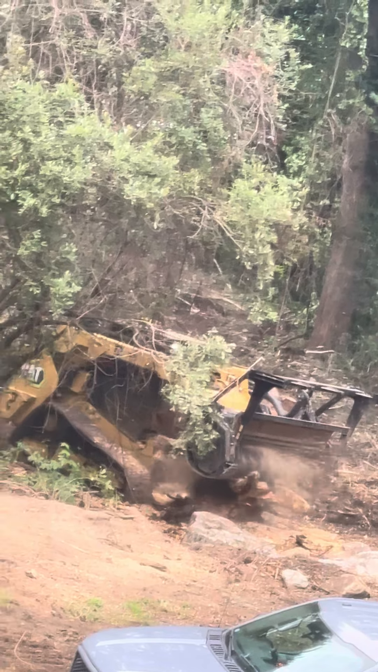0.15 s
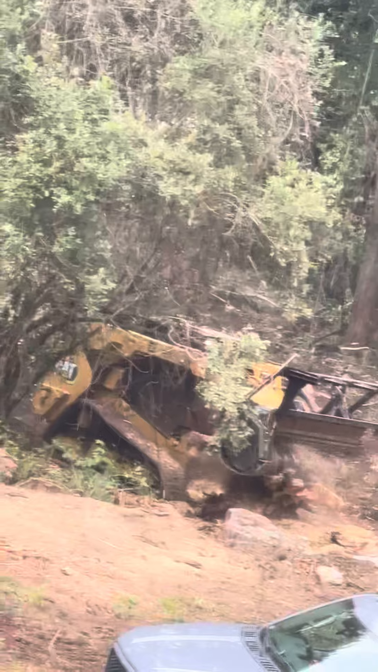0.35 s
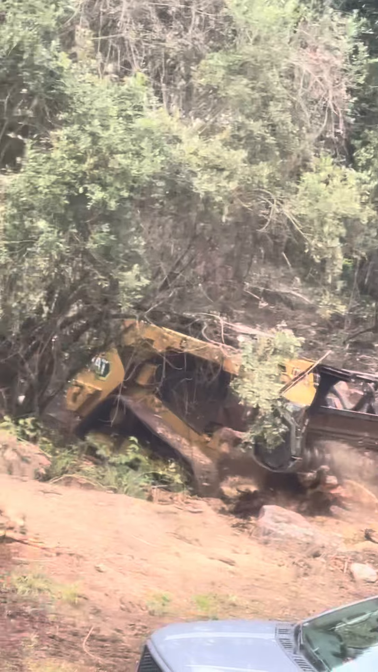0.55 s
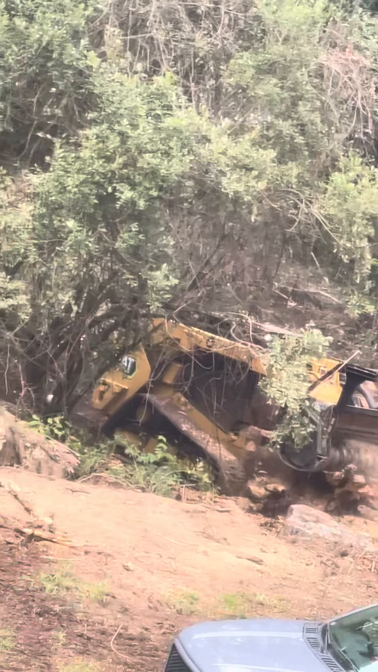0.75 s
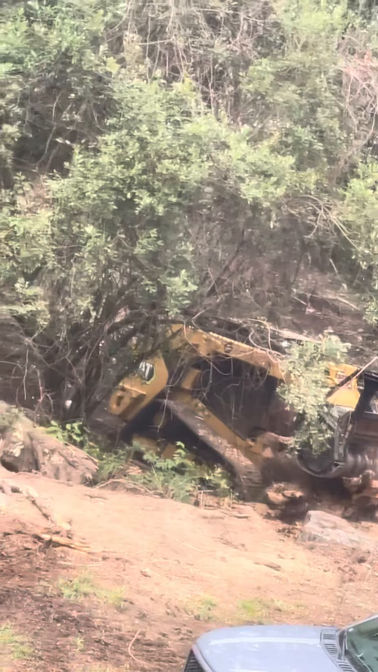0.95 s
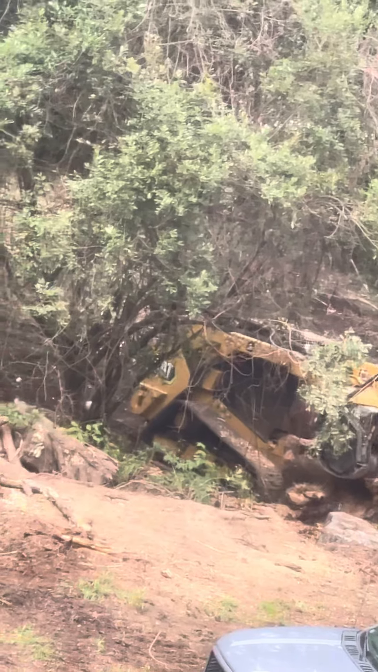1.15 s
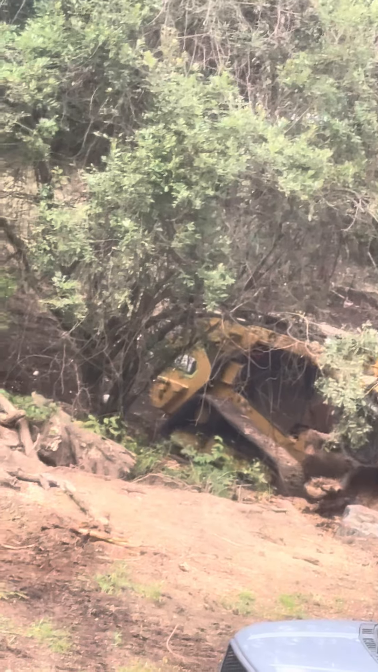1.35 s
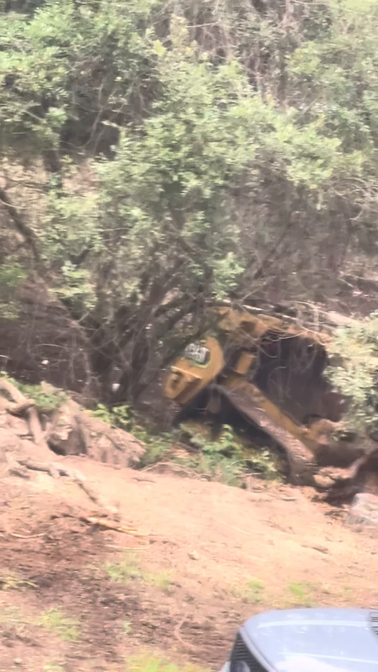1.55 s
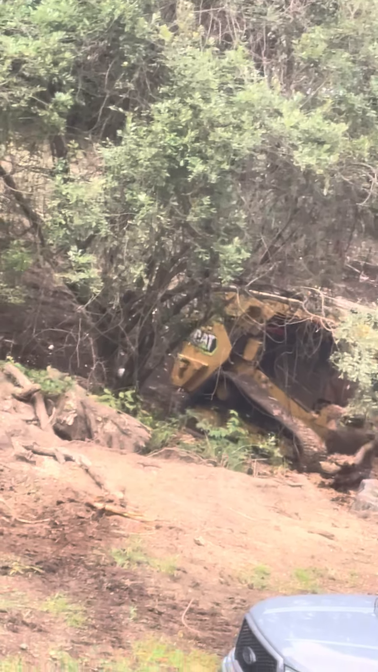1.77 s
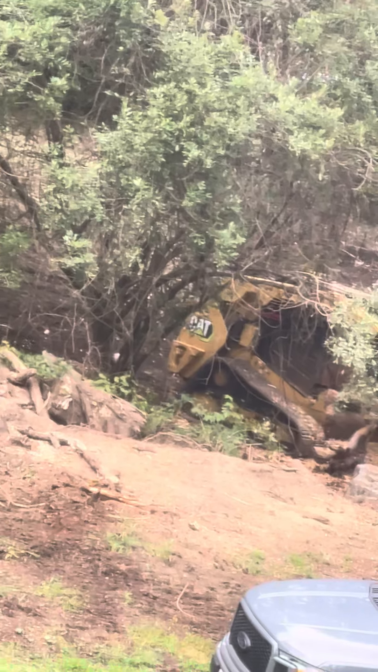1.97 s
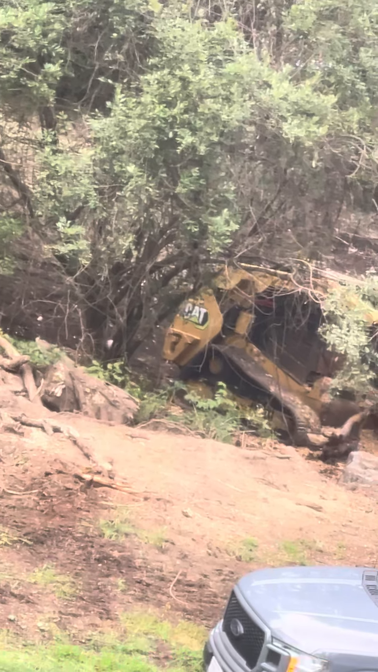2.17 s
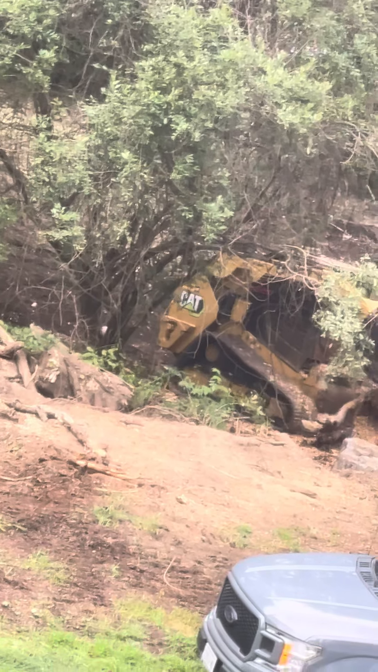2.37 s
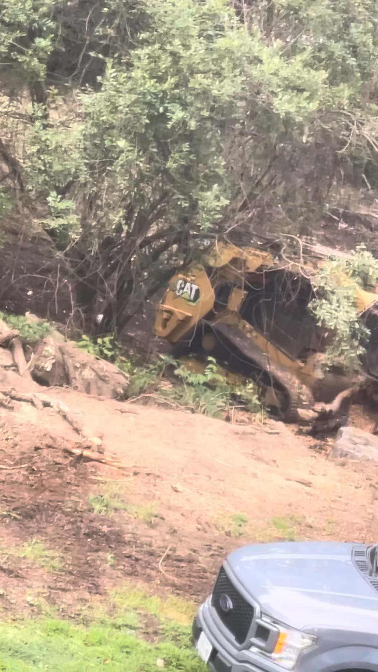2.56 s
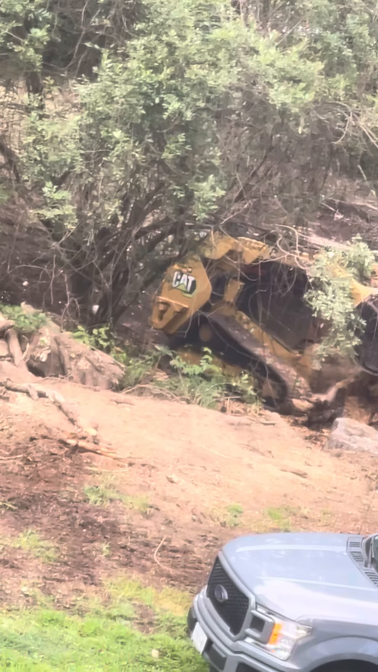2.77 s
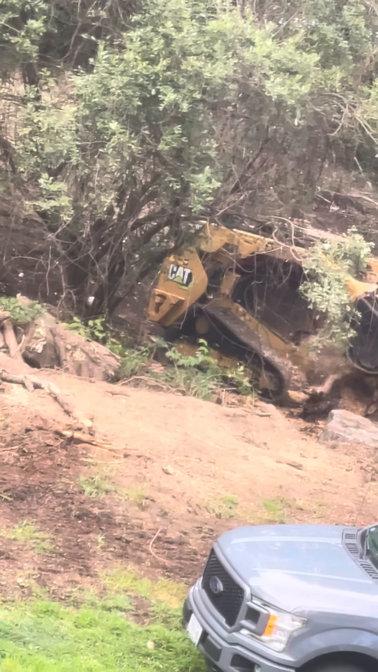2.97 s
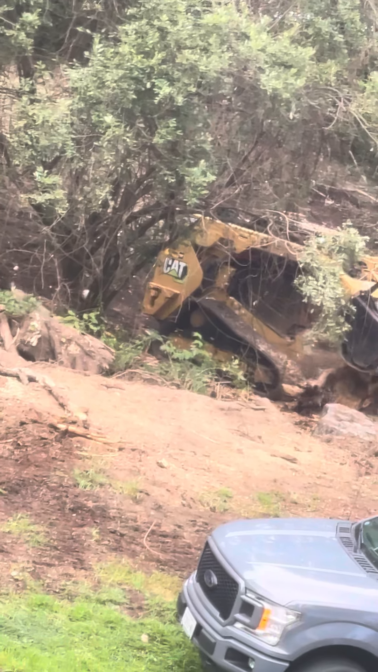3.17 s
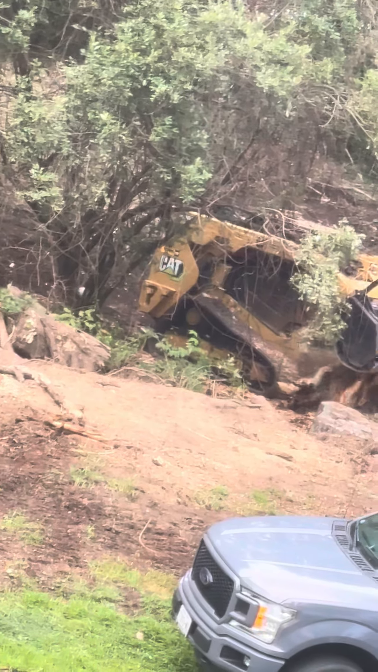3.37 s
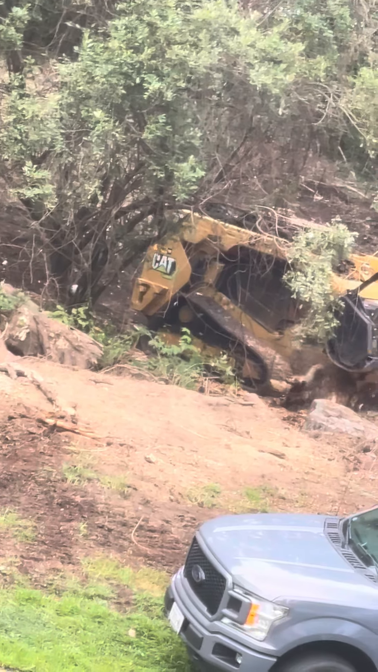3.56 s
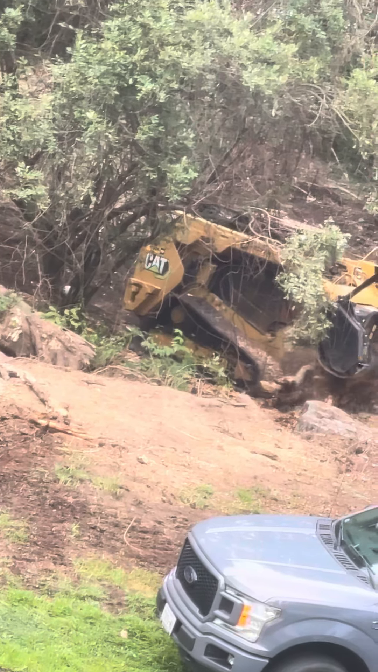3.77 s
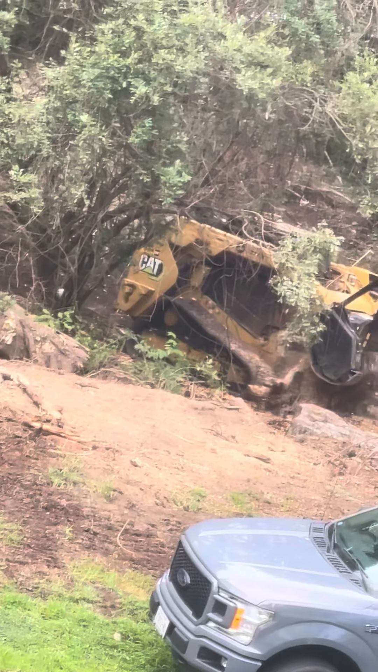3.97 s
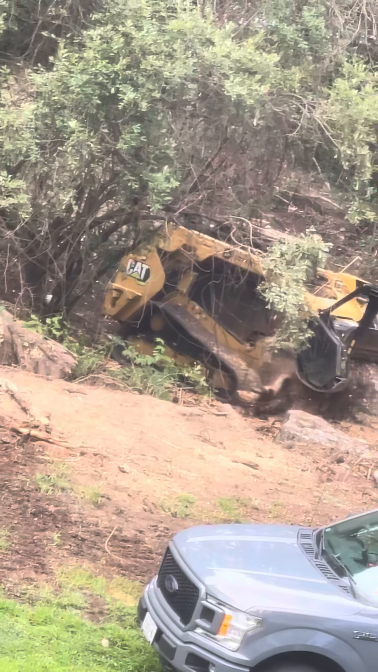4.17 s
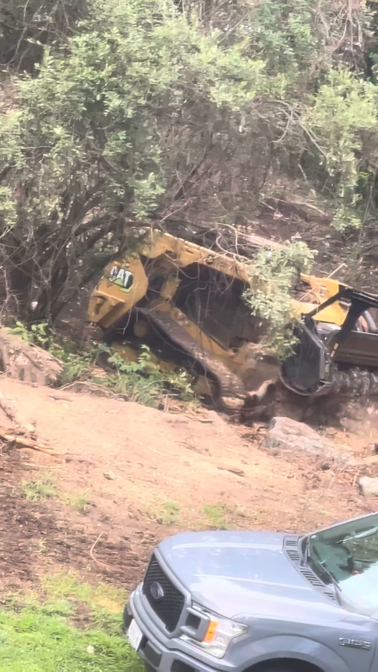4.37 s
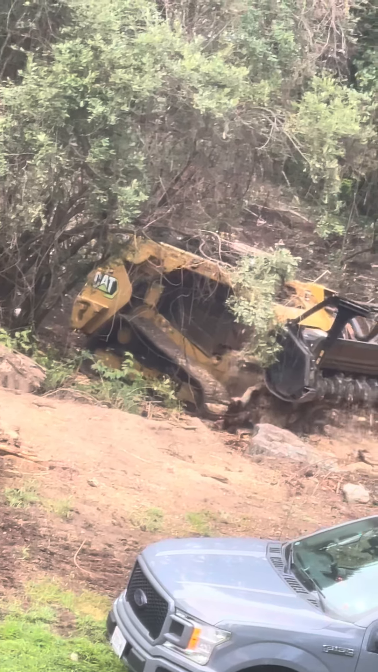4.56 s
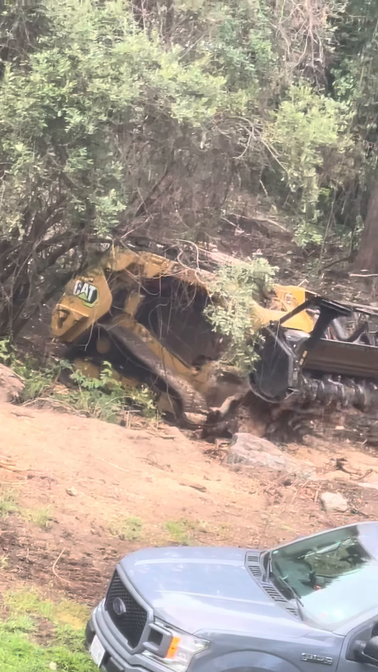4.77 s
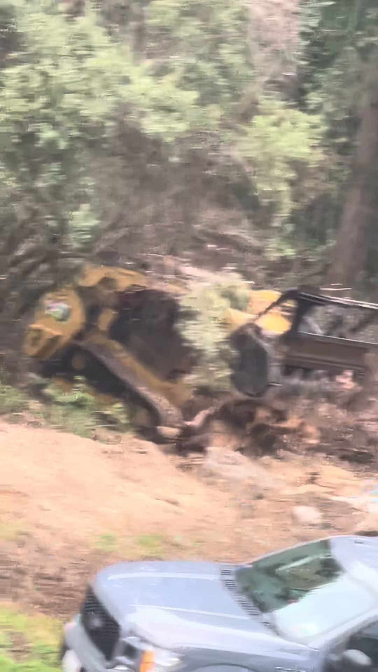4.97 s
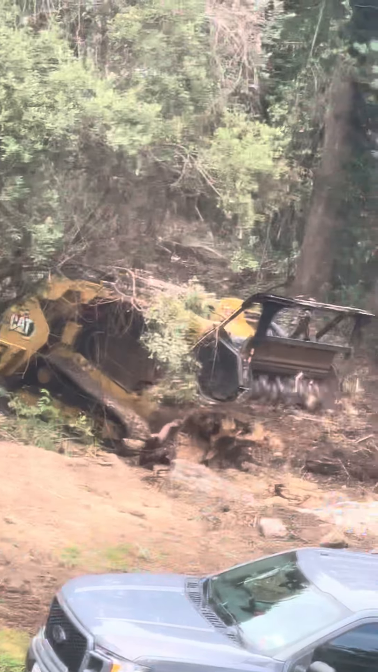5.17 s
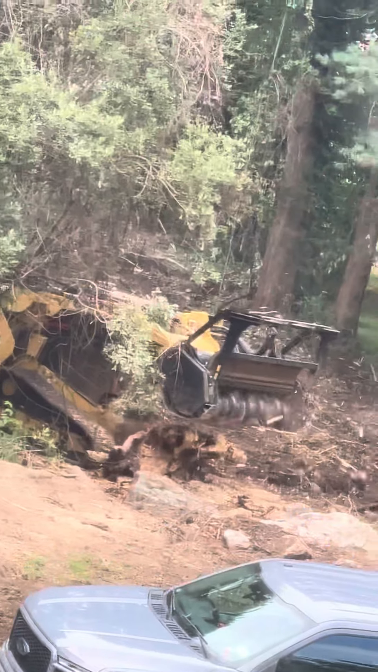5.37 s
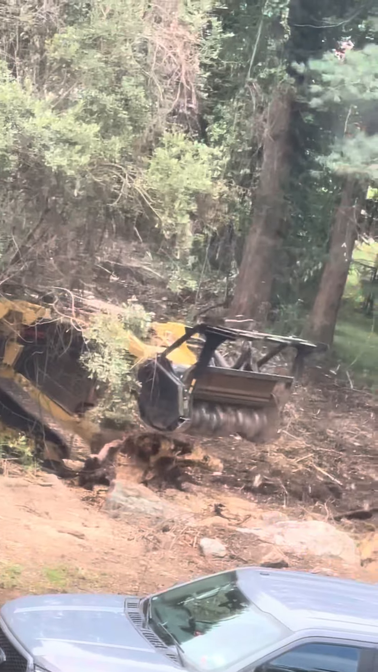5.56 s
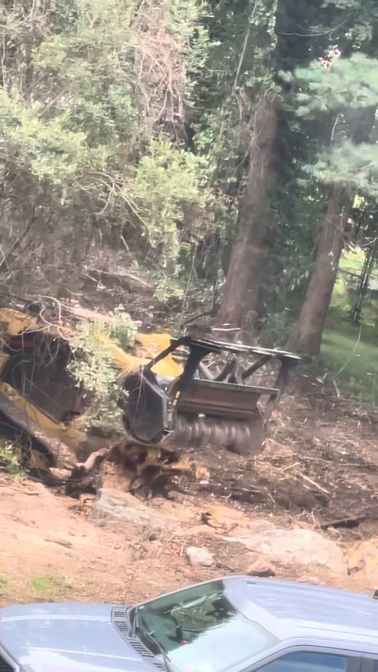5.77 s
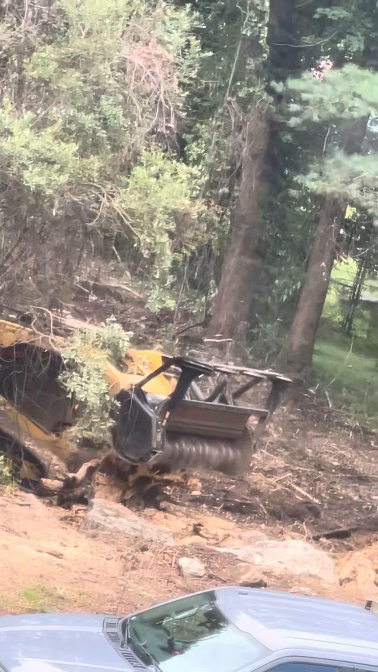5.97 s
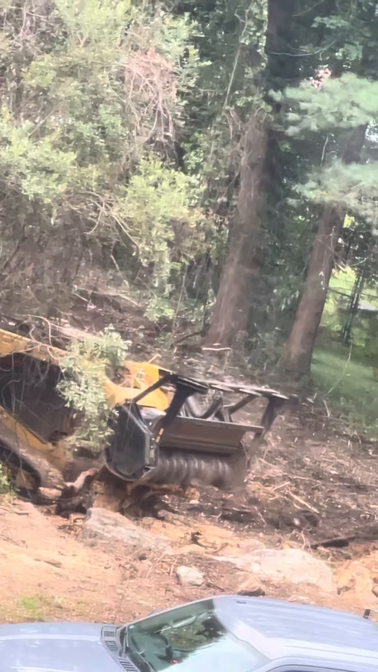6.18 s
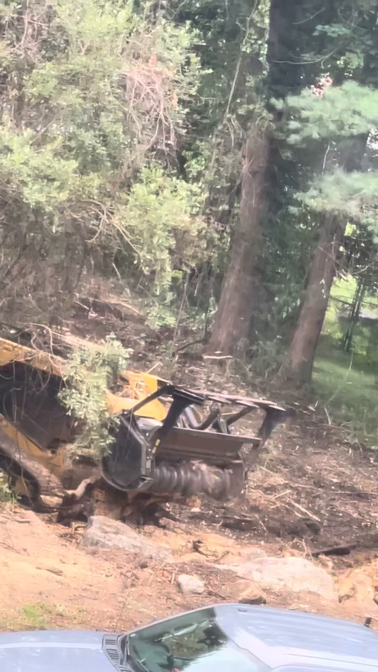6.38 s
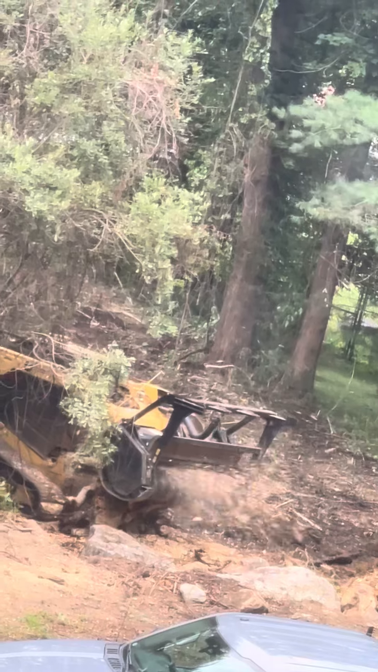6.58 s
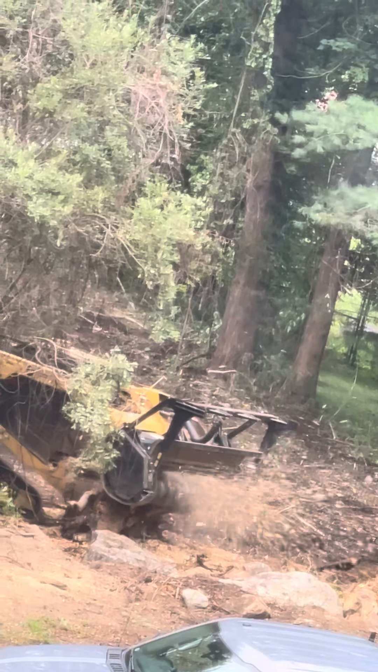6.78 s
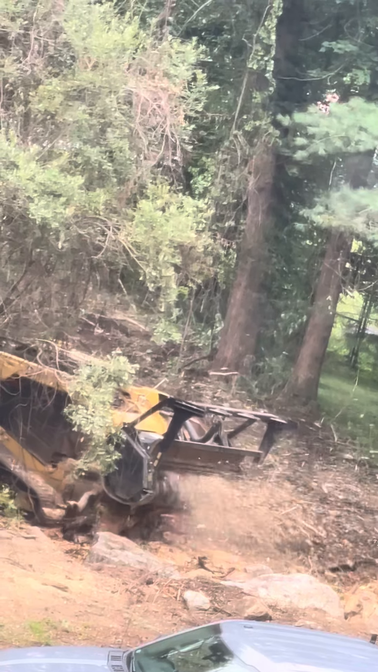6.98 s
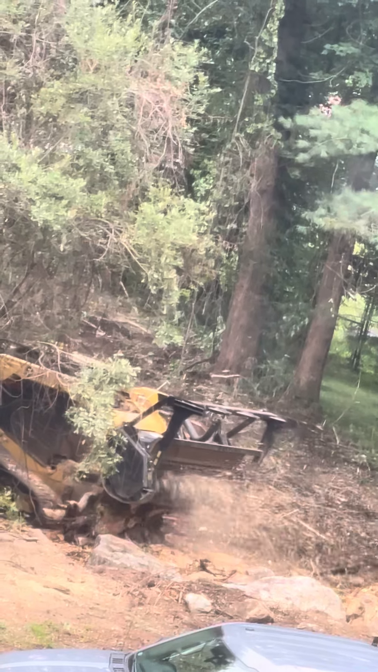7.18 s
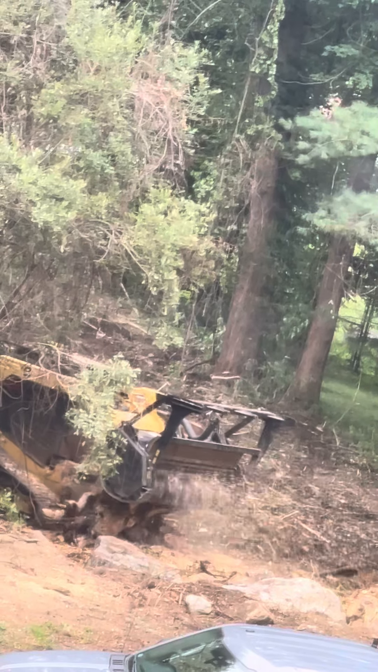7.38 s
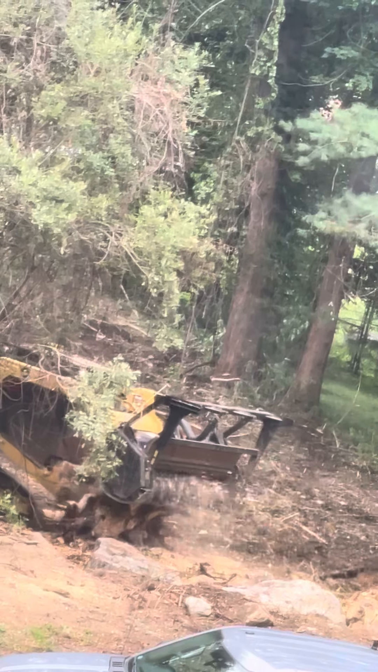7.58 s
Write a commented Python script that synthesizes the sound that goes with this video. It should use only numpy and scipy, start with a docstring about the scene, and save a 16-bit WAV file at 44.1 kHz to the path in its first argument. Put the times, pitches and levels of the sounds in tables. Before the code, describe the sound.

Across a yard, a toothed drum growls and splinters wood in bursts, separated by steady diesel drone, rising drive whine and snapping chips.

```python
"""Forestry mulcher at the edge of a wood

A tracked loader drives a toothed drum into a stump in three spells, heard from across a yard.
Tooth blows, slowed as the wood drags on the drum, scatter noise grains into thump, hood boom and splinters.
Drifting sine partials make the diesel's hum, pump, fan, drive whine and a motor groan; filtered noise its roar.
A rough valve whistle, snapping wood, crunching debris and squeaking tracks fill in the rest."""
import sys
import numpy as np
from scipy import signal
from scipy.fft import rfft, irfft, next_fast_len
from scipy.io import wavfile
from scipy.ndimage import uniform_filter1d

SR = 44100
rng = np.random.default_rng(int(sys.argv[2]) if len(sys.argv) > 2 else 0)


def to_wav(s):
    """Save 16-bit WAV."""
    ch = np.atleast_2d(s).T  # columns
    pcm = np.round(np.clip(ch, -1, 1) * 32767)  # PCM
    wavfile.write(sys.argv[1], SR, pcm.astype(np.int16))


N = 336483
TIME = np.arange(N) / SR

# pushes of the drum into the wood: start_s, end_s, rise_s, splintering_db, trend_db_per_s,
# then relative to the splintering: hood_boom_db, ground_thump_db, drum_throb_db; last drag_per_s
BITES = [(-.1, 0.426, 0.033, -21, -13.5, 9, -2.5, 0.5, 1.12),
         (0.372, 0.683, 0.099, -25.5, -1, 10, -1, 4, 1.06),
         (0.659, 1.109, 0.11, -27, -0.5, 9.9, 1.5, -11, 1.28),
         (2.664, 2.909, 0.072, -32.5, 0.5, 8.5, 6.5, 2, 0.51),
         (2.93, 3.31, 0.07, -40, 18.5, 5.5, 2, -26, 0.047),
         (3.29, 3.638, 0.08, -29, -1, 6.9, -17, -4, 0.19),
         (3.58, 3.842, 0.14, -26.5, 9.5, 6.14, -4, -4.5, 1.25),
         (3.812, 4.019, 0.06, -24, -1, 7.7, 8.5, -15, 5), (4.08, 4.199, 0.029, -29.5, -27, 4.8, 0, 3, 3.02),
         (6.369, 6.831, 0.29, -27.5, -0.5, 6.8, 9.5, 1.5, 7.6),
         (6.837, 7.57, 0.096, -28, -7, 6.93, 9.5, 3, 4.5)]
# spectrum of breaking wood: pitch_hz, level_db (per Hz)
SPLINTERS = [(300, -25), (600, 4.5), (800, -1), (1300, 1), (2000, -1), (2900, 1), (3400, -6), (4500, -6.5),
             (6000, -13.5), (8300, -16.5), (9300, -22), (11300, -24.5), (12300, -35), (15500, -40)]
FREE_HZ = 43.22  # turns a second of the unloaded drum


def mulcher(tear_s=0.0036, spray=1.0, chips_per_s=6000, chip_db=1.0, surge_db=-0.79, shower_db=1.5,
            thump_db=-4.5, boom_db=-1.44, growl_db=-6.0, fibre_db=-8, lope=0.14,
            throb_low_hz=60, throb_power=1.74):
    """Tooth blows tear out chips that shake the ground, ring the hood and crackle; tooth hum makes it growl."""
    # throb of the turning drum: multiple of its speed, level_db
    drum_orders = [(2, 1), (3, -5), (5, 0)]
    # hum of the teeth, sweeping through the hood's modes: multiple of the drum's speed, level_db
    tooth_orders = [(10, 0), (15, 0), (20, -4)]
    # spectrum of the ground thump: pitch_hz, level_db (per Hz)
    thump_spectrum = [(25, -14), (36, -13), (46, -6), (65, -3), (95, -2), (130, 5.5), (170, 1.5), (220, -2),
                      (320, -20.5), (600, -103)]
    # borders between the registers of large, middling and fine chips: pitch_hz
    chip_edges = [1230, 1860, 3380, 5860]
    turns_hz = drum_speed()
    splintering, booming, digging, throbbing = bite_levels()

    throb = partials(turns_hz, drum_orders, waver_db=1.0, waver_hz=25.4, smear=0.044)
    throb = throbbing * (turns_hz / FREE_HZ) ** throb_power * throb
    # a low cut thins the slowest throb
    throb = signal.sosfilt(signal.butter(4, throb_low_hz, "high", fs=SR, output="sos"), throb)

    tear_decay = np.exp(-1 / (tear_s * SR))
    tearing = unit(signal.lfilter([1], [1, -tear_decay], tooth_strikes(turns_hz, spread_db=3.0)))
    # the cut is heavier twice in every turn
    loping = 1 + lope * np.cos(4 * np.pi * np.cumsum(turns_hz) / SR)
    force = (tearing + spray) * amp(surge_db * drift(35)) * loping

    def chips():
        return force * rng.standard_normal(N) * (rng.random(N) < chips_per_s / SR)

    thump = amp(thump_db) * unit(woods(shape(chips(), thump_spectrum), wet_db=-7))
    boom = amp(boom_db) * unit(woods(hood(chips), wet_db=-10.0))
    hum = partials(turns_hz, tooth_orders, waver_db=1.5, waver_hz=60, smear=.9)
    growl = amp(growl_db) * unit(hood(lambda: hum))

    chip_gain = amp(chip_db * np.minimum(rng.exponential(1, N), 5))
    crackle = shape(chips() * chip_gain, SPLINTERS)
    # chips of different sizes come in separate showers, each with its own register
    crackle = sum(band * amp(shower_db * drift(45)) for band in registers(crackle, chip_edges))
    crackle = unit(woods(crackle, wet_db=-0.5))
    splinters = crackle + amp(fibre_db) * fibres(force)
    return throb + digging * thump + booming * (boom + growl) + splintering * splinters


def drum_speed(start_hz=37.5, lug_hz=20, spin_up_per_s=2.5, size=100):
    """Turns a second: wood brakes the drum toward lug_hz, and the drive winds it up when drag is light."""
    drags = sum(max(drag, 0) * grip(start, end, rise) for start, end, rise, *levels, drag in BITES)
    hz, speeds = start_hz, []
    for drag in drags[::size]:
        winding_up = spin_up_per_s * max(1 - drag, 0) * (FREE_HZ - hz)
        braking = drag * (hz - lug_hz)
        hz += (winding_up - braking) * size / SR
        speeds.append(hz)
    return np.interp(TIME, TIME[::size], speeds)


def bite_levels():
    """Gains of splintering, hood boom, ground thump and drum throb; overlapping bites add in power."""
    power = 0
    for *stroke, hood_db, ground_db, throb_db, drag in BITES:
        power = power + (push(*stroke) * amp([[0], [hood_db], [ground_db], [throb_db]])) ** 2
    return np.sqrt(power)


def tooth_strikes(turns_hz, spread_db=2.0, slip=.12, teeth=5):
    """One blow each time a row of teeth meets the wood, uneven in force and timing."""
    rows_passed = np.floor(teeth * np.cumsum(turns_hz) / SR + slip * drift(150))
    hit = np.diff(rows_passed, prepend=rows_passed[0]) > 0
    force = amp(spread_db * np.clip(rng.standard_normal(N), -2, 2))
    return hit * force / np.sqrt(turns_hz)


def hood(blows):
    """Each mode of the steel hood rings under its own call for blows, in alternating polarity."""
    # ringing modes: pitch_hz, width_hz, level_db
    modes = [(251, 33, -9), (286, 33, -3.5), (338, 26.7, 1.5), (395, 30.5, 2), (441.6, 34.5, -2.5),
             (480.6, 19, -8), (542.4, 23, -6), (619, 21, -17)]
    ring = 0
    for k, (hz, width, db) in enumerate(modes):
        mode = signal.lfilter(*signal.iirpeak(hz, hz / width, SR), blows())
        ring = ring + amp(db) * mode * (-1) ** k
    return signal.sosfilt(signal.butter(3, [210, 680], "band", fs=SR, output="sos"), ring)


def fibres(force, cracks_per_s=260, crack_db=1.0, ring_s=0.015, count=16):
    """Wood fibres split one by one, each with a short decaying knock at one of several pitches."""
    # range of the knocks: lowest_hz, highest_hz
    pitch_range = (890, 4440)
    loudness = amp(crack_db * np.minimum(rng.exponential(1, N), 4))
    cracks = force * (rng.random(N) < cracks_per_s / SR) * loudness
    kind, age = rng.integers(0, count, N), TIME[:SR // 20]
    out = 0
    for k, hz in enumerate(np.geomspace(*pitch_range, num=count)):
        ring = amp(-60 * age / ring_s) * np.sin(2 * np.pi * hz * age)
        out = out + signal.oaconvolve(cracks * (kind == k), ring)[:N]
    return unit(woods(out, wet_db=-1.0))


def knocks():
    """Single hard blows of the drum excite all the hood's modes at once."""
    # booming blows: time_s, peak_db (before scattering)
    blow_table = [(0.382, -5), (0.488, -8.5), (0.712, -19), (0.985, -11), (2.694, -17), (2.722, -14),
                  (3.447, -13), (6.423, -19), (6.478, -15.5), (6.577, -10.5), (6.808, -9.5), (7.094, -16)]
    s, db = np.transpose(blow_table)
    blows = np.bincount(np.round(s * SR).astype(int), amp(db), N)
    one_blow_peak = abs(hood(lambda: signal.unit_impulse(N))).max()
    return woods(hood(lambda: blows) / one_blow_peak, wet_db=-8.0)


def snaps(crack_db=-5, tick_db=-11, crack_hz=3600, tick_hz=5000, tick_top_hz=10500, rise_s=.0035, size=12000):
    """Larger pieces break off in short noise bursts: woody cracks, or bright ticks on steel."""
    # snapping wood and chips on steel: time_s, level_db, ring_s (to fall 60 dB), brightness (0-1)
    snap_table = [(2.642, -22, 0.03, 0.89), (2.684, -17, 0.037, 0.88), (2.726, -15, 0.056, 0.6),
                  (2.747, -8.5, 0.044, 0.5), (2.791, -16.5, 0.3, 0.42), (2.853, -8.5, 0.04, 0.44),
                  (2.867, -6, 0.039, 0.5), (2.906, -1.5, 0.029, 0.4), (2.911, -2, 0.033, 0.38),
                  (3.156, -10.5, 0.051, 0.48), (3.202, -7.5, 0.044, 0.14), (3.254, -15, 0.072, 0.75),
                  (3.371, -11, 0.054, 0.79), (3.68, -8.5, 0.061, 0.06), (3.88, -11, 0.053, 0.12),
                  (4.022, -12.5, 0.14, 0.94), (4.235, -11.5, 0.096, 0.76), (5.03, -30, 0.043, .95),
                  (6.361, -13.5, 0.034, 0.56), (6.383, -14, 0.036, 0.57), (6.416, -19, 0.13, 0.3),
                  (6.452, -17, 0.063, 0.37), (6.469, -17.5, 0.055, 0.65), (6.523, -12.5, 0.056, 0.36),
                  (6.577, -7, 0.037, 0.29), (6.63, -10, 0.057, 0.18)]

    def burst(hz, side):
        noise = shape(rng.standard_normal(N), SPLINTERS)
        return unit(signal.sosfilt(signal.butter(2, hz, side, fs=SR, output="sos"), noise))

    crack = amp(crack_db) * burst(crack_hz, "low")
    tick = amp(tick_db) * burst([tick_hz, tick_top_hz], "band")
    out, age = np.zeros(N), TIME[:size]
    for s, db, t60, bright in snap_table:
        start, bright = round(s * SR), np.clip(bright, 0, 1)
        span = slice(start, start + size)
        envelope = amp(db - 60 * age / t60) * (1 - np.exp(-age / rise_s))
        out[span] += envelope * ((1 - bright) * crack[span] + bright * tick[span])
    return woods(out, wet_db=-7.0)


def stump_heaves():
    """The stump heaves under the drum in brief low tones."""
    # heaves: time_s, pitch_hz, level_db, length_s
    heaves = [(2.84, 66, -20, 0.029), (4.21, 52.66, -21, 0.027), (6.8, 46, -33, .13)]
    return swells(heaves, smear=.3, waver_hz=31.0)


def engine(governed_hz=82, clatter=0.068, roar_db=-37, lug_db_per_hz=0.07, gust_db=.45, gust_hz=16, fan_hz=257.5):
    """Exhaust and pump orders, fan tones, and a roar that pulses with each firing and eases as it lugs."""
    # exhaust note: time_s, level_db
    exhaust = [(0, -41), (2.5, -33.5), (3.5, -34.5), (4.4, -31), (5, -36), (7.6, -34.5)]
    # exhaust orders: multiple of the firing rate, level_db
    engine_orders = [(1, -2), (1.5, -35), (2, -8), (3, -17.5), (5.5, -15), (6, -19.5)]
    # spectrum of the roar: pitch_hz, level_db (per Hz)
    roar_spectrum = [(18, -17), (30, -47), (48, -11.5), (75, -8), (205, -10), (374, -7), (485, -9),
                     (662, -16), (754, -19.5), (859, -21.5), (2920, -24.5), (7430, -41), (10700, -49),
                     (12200, -79), (15000, -79)]
    # song of the nine-piston hydraulic pump: multiples of the firing rate
    pump_orders = [4.5, 9]
    # the pump's two tones: time_s, lower_db, upper_db
    pump_levels = [(1.5, -43.5, -62), (1.8, -43, -59), (1.95, -44, -53), (2.25, -39.5, -52),
                   (2.471, -42, -50), (2.6, -52, -62), (4.5, -48, -65), (5.3, -44, -57), (5.7, -44.5, -51),
                   (6, -46, -49), (6.3, -45.5, -58)]
    # harmonics of the cooling fan's blade rate: time_s, first_db, second_db, third_db, fourth_db
    fan_levels = [(0, -34, -53, -60, -66), (1.7, -41, -46, -64, -69), (2.3, -40, -43.5, -67, -65),
                  (2.6, -42.5, -61, -83, -76), (4.3, -44, -45.5, -56, -68), (4.65, -46, -44, -57, -66),
                  (4.9, -45.5, -65, -55.5, -74), (5.2, -47, -52, -53, -58), (5.8, -57, -50, -53, -54.5),
                  (6.1, -50, -47, -61, -56), (6.4, -38, -47.5, -55, -53)]
    hz, blades = firing_rate(governed_hz), np.full(N, fan_hz)
    note = amp(curves(exhaust)[0]) * partials(hz, engine_orders, waver_db=1.4, waver_hz=9, smear=0.18)
    pump = partials(hz, zip(pump_orders, curves(pump_levels)), waver_db=1.0, waver_hz=18, smear=0.13)
    fan = partials(blades, enumerate(curves(fan_levels), 1), waver_db=2.0, waver_hz=18, smear=0.4)
    pulsing = 1 + clatter * np.cos(2 * np.pi * np.cumsum(hz) / SR)
    roar = unit(shape(rng.standard_normal(N) * pulsing, roar_spectrum))
    roar_level_db = roar_db - lug_db_per_hz * (governed_hz - hz) + gust_db * drift(gust_hz)
    return note + pump + fan + roar * amp(roar_level_db)


def firing_rate(governed_hz, recover_s=.19):
    """Hydraulic loads drag the engine below its governed firing rate in smooth dips, then it recovers."""
    # dips: deepest_s, depth_hz, sink_s
    sags = [(1.08, 6.54, 1.22), (2.45, 12.64, .43), (2.83, 7.77, 0.18), (3.849, 9.67, .7), (6, 3.4, 0.333),
            (6.9, 2.21, 0.28)]
    hz = np.full(N, float(governed_hz))
    for s, depth_hz, sink_s in sags:
        width_s = np.where(TIME < s, sink_s, recover_s)
        hz -= depth_hz * np.exp(-((TIME - s) / width_s) ** 2)
    return hz


def hydraulics():
    """The valve's whistle, the drum drive's whine ringing its housing, and a later low motor groan."""
    # drum drive whining as it gathers speed: time_s, base_hz, level_db
    whine_curve = [(1.45, 180, -63), (1.7, 191, -57), (1.85, 195, -59), (1.95, 204, -56), (2.15, 225, -56),
                   (2.45, 255, -53), (2.6, 263, -52), (2.75, 265, -55), (3, 264, -70)]
    # partials of the whine: multiple of its base, level_db
    whine_orders = [(3, -3), (4, -3), (5, -2), (6, -5), (7, -9), (8, -5), (9, -4)]
    # resonance of the drive housing: pitch_hz, width_hz, gain_db
    housing = (2360, 130, -2)
    # two gliding tones, one table each: the second partial of the drive's whine as it rises,
    # then a later low motor groan: time_s, pitch_hz, level_db
    glides = [
        [(1.8, 380, -48), (1.95, 408, -40), (2.17, 448, -39.5), (2.3, 455, -52)],
        [(5.85, 335, -46), (5.96, 348, -36.5), (6.05, 365, -40), (6.18, 397, -35.5), (6.3, 405, -52)],
    ]
    hz, db = curves(whine_curve)
    whine = partials(hz, whine_orders, waver_db=3, waver_hz=30, smear=.6)
    whine = during(whine_curve) * amp(db) * whine
    ring_hz, width_hz, ring_db = housing
    out = valve() + whine + amp(ring_db) * resonate(whine, ring_hz, width_hz)
    for rows in glides:
        hz, db = curves(rows)
        glide = partials(hz, [(1, 0)], waver_db=1.5, waver_hz=18, smear=0.25)
        out += during(rows) * amp(db) * glide
    return out


def valve(jitter_hz=55, flutter_db=3.2, wobble_hz=20, tone_db=-.5, drop_db=-1, rush_db=-5.5,
          rush_width_hz=260, low_ratio=.925, idle_db=-60.5):
    """A rough whistle that drops to a lower note now and then, in a rush of oil around both notes."""
    # main note: time_s, pitch_hz
    pitch_curve = [(1.78, 3130), (1.87, 3060), (1.91, 2935), (2.45, 2945), (2.5, 3070), (2.55, 3020),
                   (2.62, 3140), (2.72, 3160), (3.05, 2970), (6.07, 2965), (6.11, 3060), (6.16, 2970),
                   (6.25, 3060)]
    # strands of the whistle: ratio to the main note, level_db
    strands = [(1, 0), (1.305, -14), (1.87, -27), (2.27, -26)]
    # brief drops to the lower note: centre_s, half_length_s
    drops = [(1.915, .016), (2.03, .008), (2.14, .016), (2.25, .012), (2.36, .01), (3.11, .018),
             (5.72, .05), (5.885, .035), (6.02, .025)]
    # oil sings while a lever is held: start_s, end_s, rise_s, level_db, trend_db_per_s
    levers = [(1.733, 3.503, 0.13, -46.5, 1), (5.5, 6.24, 0.25, -55.5, 3)]
    hz = curves(pitch_curve)[0]
    low = sum(np.exp(-((TIME - s) / length) ** 4) for s, length in drops)

    def whistle(f):
        rough_hz = f + wobble_hz * drift(30) + jitter_hz * drift(450)
        return unit(np.sin(2 * np.pi * np.cumsum(rough_hz) / SR)) * amp(flutter_db * drift(70))

    high_note = sum(amp(db) * whistle(ratio * hz) for ratio, db in strands)
    tone = (1 - low) * high_note + low * amp(drop_db) * whistle(low_ratio * hz)
    rush = 0
    for f in (hz, low_ratio * hz):
        once = resonate(rng.standard_normal(N), f, rush_width_hz)
        rush = rush + resonate(once, f, rush_width_hz)
    flow = amp(idle_db) + sum(push(*lever) for lever in levers)
    return flow * (amp(tone_db) * tone + amp(rush_db) * unit(rush))


def debris(grains_per_s=1500, grain_db=2.0, clump_db=3.0):
    """Twigs and stones crushed under the moving tracks: clumping noise grains."""
    # crunching spells: start_s, end_s, rise_s, level_db, trend_db_per_s
    rolls = [(1.848, 2.398, 0.18, -46.5, -3), (5.547, 6.307, 0.42, -45, -3)]
    loudness = amp(grain_db * np.minimum(rng.exponential(1, N), 4))
    grains = rng.standard_normal(N) * (rng.random(N) < grains_per_s / SR) * loudness
    crunch = unit(woods(shape(grains * amp(clump_db * drift(40)), SPLINTERS), wet_db=0.0))
    return sum(push(*roll) for roll in rolls) * crunch


def track_squeaks():
    """Steel tracks squeak in brief high tones with a roughened phase."""
    # squeaks: time_s, pitch_hz, level_db, length_s
    squeaks = [(3.29, 12000, -62, .05), (3.38, 11000, -56, .05), (3.97, 11000, -53, .04),
               (4.94, 10900, -60, .02), (5.03, 10800, -62, .03), (5.61, 8200, -48, .007)]
    return swells(squeaks, smear=2.6, waver_hz=420)


def woods(x, wet_db, size=30000):
    """Scattering from trunks and the hillside: sparse taps, each band dying at its own speed."""
    # decay of the scattering: pitch_hz, t60_s
    decay = [(100, 0.44), (400, 1), (2000, 0.99), (6000, 1), (14000, 0.65)]
    # random echoes begin after 12 ms
    late = np.arange(size) > .012 * SR
    taps = rng.choice([-1., 1.], size) * (rng.random(size) < 2000 / SR) * late
    hz, t, z = signal.stft(taps, SR, nperseg=256)
    tail = signal.istft(z * amp(-60 * t / read(decay, hz)[:, None]), SR, nperseg=256)[1]
    return x + amp(wet_db) * signal.oaconvolve(x, tail / np.linalg.norm(tail))[:N]


def microphones(x):
    """Resonances of the path, then two ports that differ in phase, level and likeness."""
    # resonances of the path to the microphones, colouring every sound: pitch_hz, width_hz, level_db
    colour = [(656, 43, -5), (999, 26.5, -7.5), (1252, 54, 2.5), (1396, 40, -3.5), (1567, 51, 4.5),
              (1750, 150, -1.5), (1993, 65, 2.5), (3450, 194, -6), (3600, 47, 0.5)]
    # microphone pair: pitch_hz, left_lead_rad, left_minus_right_db, coherence (0-1)
    ports = [(250, 0, 0, 1), (480, .22, .3, 1), (650, .6, 2.5, .94), (730, .2, 6, .85), (800, .8, 2, .9),
             (940, 1.4, 10, .7), (1060, -1.6, 8, .7), (1250, -1.4, 0, .9), (1430, -1.5, -2.5, .9),
             (1520, .3, -3, .94), (1750, 0, 0, 1), (5100, 0, 0, 1), (5400, -1, 0, .82),
             (11000, -1.25, 0, .7), (14000, -1.3, 0, .4)]
    size = next_fast_len(N + 4096)
    hz = np.fft.rfftfreq(size, 1 / SR)
    colour_db = sum(db * np.exp(-((hz - f) / width) ** 2) for f, width, db in colour)
    mid = rfft(x, size) * amp(colour_db)
    lead, balance_db, same = [read(ports, hz, axis) for axis in (1, 2, 3)]
    same = np.clip(same, 0, 1)
    # a phase that advances unevenly with pitch makes the channels unlike
    turns = np.cumsum(rng.random(400))
    scatter = np.exp(2j * np.pi * np.interp(hz, np.linspace(0, SR / 2, num=400), turns))
    direct, diffuse = np.sqrt((1 + same) / 2), np.sqrt((1 - same) / 2) * np.conj(scatter)
    port = amp(balance_db / 2) * np.exp(.5j * lead)
    pair = np.array([port * (direct + diffuse), (direct - diffuse) / port])
    # the smoothed response of the channels' average stays even
    centre = np.sqrt(uniform_filter1d(abs(pair.mean(0)) ** 2, size=500))
    return irfft(mid * pair / centre, size)[:, :N]


def partials(hz, orders, waver_db, waver_hz, smear):
    """Multiples of a turning rate, each wavering in level and phase."""
    angle = 2 * np.pi * np.cumsum(hz) / SR
    out = 0
    for k, db in orders:
        level = amp(db + waver_db * drift(waver_hz))
        phase = smear * drift(waver_hz) + 2 * np.pi * rng.random()
        out = out + level * np.sin(k * angle + phase)
    return np.sqrt(2) * out


def swells(rows, smear, waver_hz):
    """Brief unsteady tones that swell and die away."""
    waver, out = smear * drift(waver_hz), 0
    for s, hz, db, length in rows:
        envelope = amp(db) * np.exp(-((TIME - s) / length) ** 2)
        out = out + envelope * np.sin(2 * np.pi * hz * TIME + waver)
    return out


def grip(start_s, end_s, rise_s, release_db_per_s=89.5):
    """Takes hold, stays, and dies away after letting go."""
    return np.clip((TIME - start_s) / rise_s, 0, 1) * amp(-release_db_per_s * np.maximum(TIME - end_s, 0))


def push(start_s, end_s, rise_s, db, trend_db_per_s):
    """The strength of one push, which grows or eases while it is held."""
    held_s = np.clip(TIME, start_s, end_s) - start_s
    return grip(start_s, end_s, rise_s) * amp(db + trend_db_per_s * held_s)


def resonate(x, hz, width_hz):
    """A resonance of gain 1 that can follow a curve: shift to zero pitch, smooth, shift back."""
    turn = np.exp(2j * np.pi * np.cumsum(hz * np.ones(N)) / SR)
    r = np.exp(-np.pi * width_hz / SR)
    return 2 * (turn * signal.lfilter([1 - r], [1, -r], x / turn + 1e-18)).real


def shape(x, points, size=4096):
    """A causal minimum-phase filter with the given spectrum."""
    log_gain = np.log(amp(read(points, abs(np.fft.fftfreq(size, 1 / SR)))))
    taps = np.fft.ifft(np.exp(np.conj(signal.hilbert(log_gain)))).real
    return signal.oaconvolve(x, taps[:size // 2])[:N]


def registers(x, edges_hz):
    """Splits a sound into adjoining bands."""
    spectrum, band = rfft(x), np.searchsorted(edges_hz, np.fft.rfftfreq(N, 1 / SR))
    return [irfft(spectrum * (band == k), N) for k in range(len(edges_hz) + 1)]


def drift(rate_hz):
    """Smooth chance of rms 1: random knots at the given rate, joined by straight lines."""
    knots = rng.standard_normal(4000)
    return unit(np.interp(TIME * rate_hz, np.arange(len(knots)), knots))


def during(rows):
    """One while a table lasts, with soft edges."""
    inside = (TIME >= rows[0][0]) & (TIME <= rows[-1][0])
    return uniform_filter1d(inside * 1., size=1500)


def curves(rows):
    """Each column of a table, joined by straight lines in time."""
    s, *columns = np.transpose(rows)
    return [np.interp(TIME, s, c) for c in columns]


def read(rows, hz, axis=1):
    """One column of a table on a log-frequency axis."""
    table = np.transpose(rows)
    return np.interp(np.log(hz + 1), np.log(table[0] + 1), table[axis])


def amp(db):
    """Decibels to gain."""
    return 10 ** (np.asarray(db) / 20)


def unit(x):
    """Scales to rms 1."""
    return x / np.sqrt(np.mean(x ** 2) + 1e-20)


def scene():
    """Every source reaches the microphones from one place across the yard."""
    cutting = mulcher() + knocks() + snaps() + stump_heaves()
    machine = engine() + hydraulics() + debris() + track_squeaks()
    return microphones(cutting + machine)


def record(dry, low_cut_hz=34, edge_hz=15700):
    """The recorder's low cut and band limit."""
    dry = signal.sosfilt(signal.butter(6, low_cut_hz, "high", fs=SR, output="sos"), dry)
    band_limit = signal.firwin(511, edge_hz, window=("kaiser", 9), fs=SR)
    return signal.oaconvolve(dry, band_limit[None], "same")


dry = scene()
out = record(dry)
to_wav(out)
```